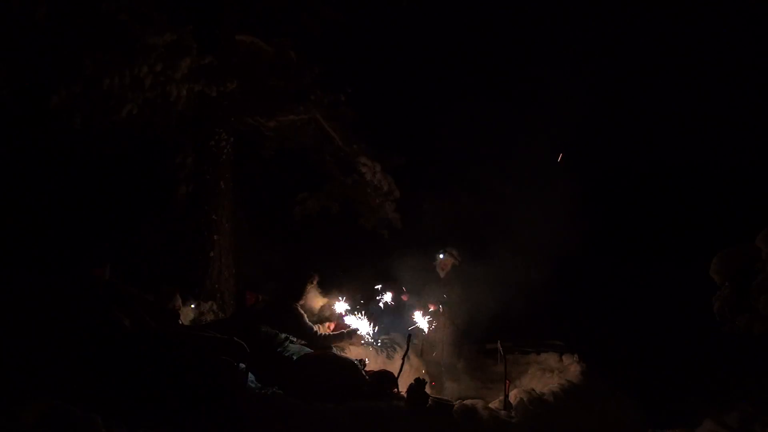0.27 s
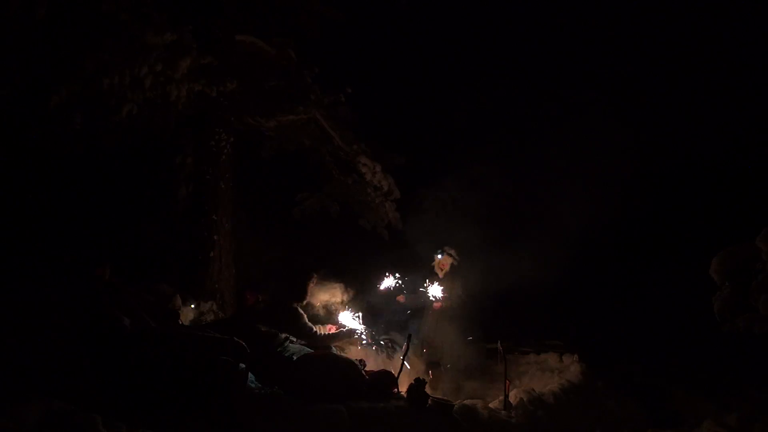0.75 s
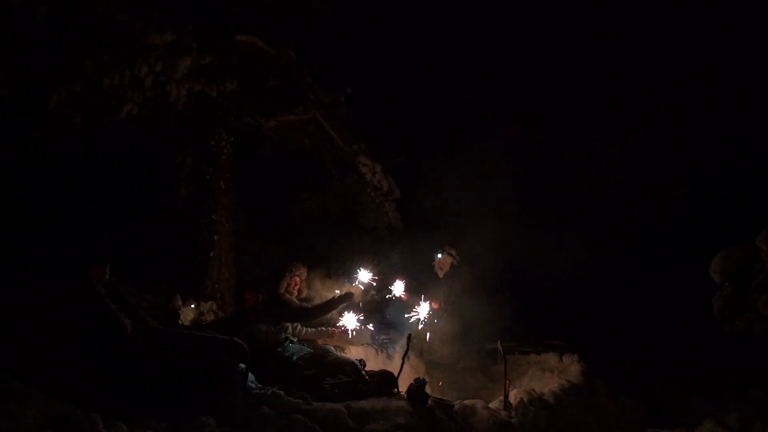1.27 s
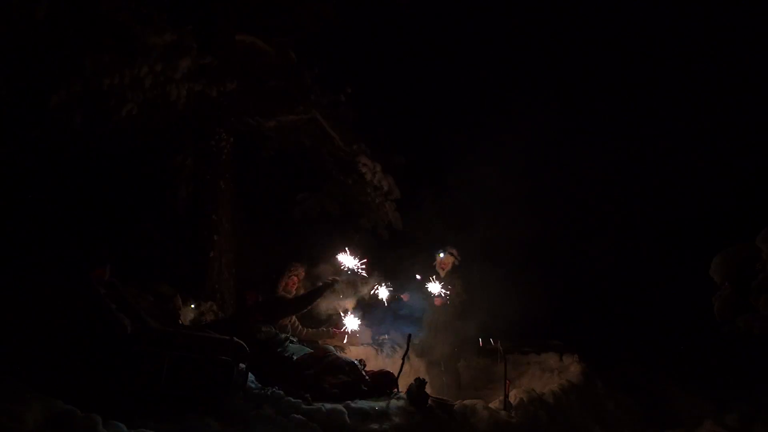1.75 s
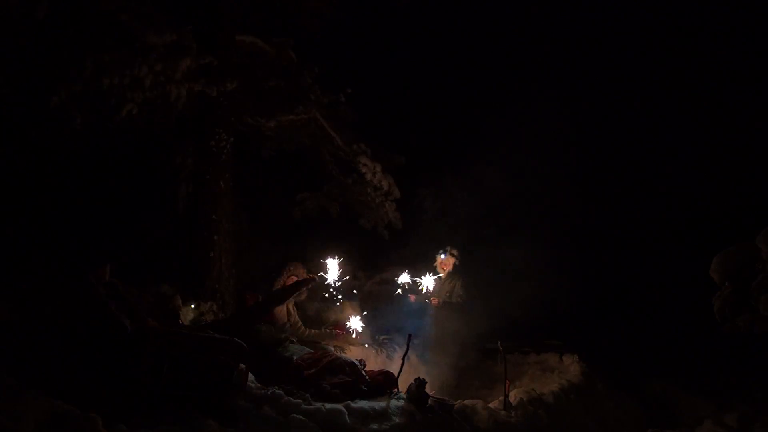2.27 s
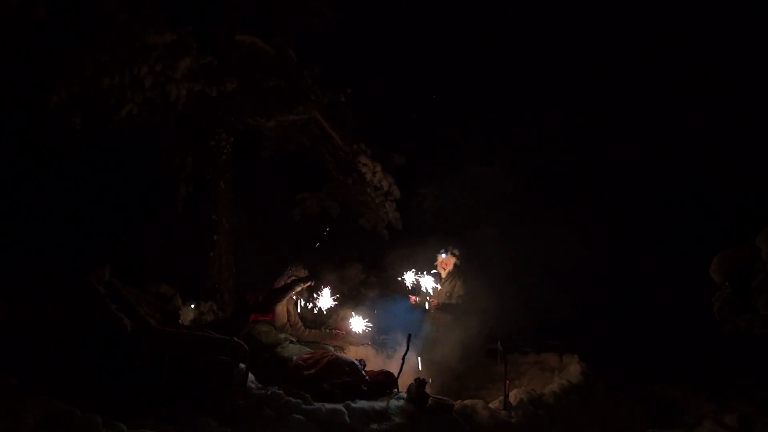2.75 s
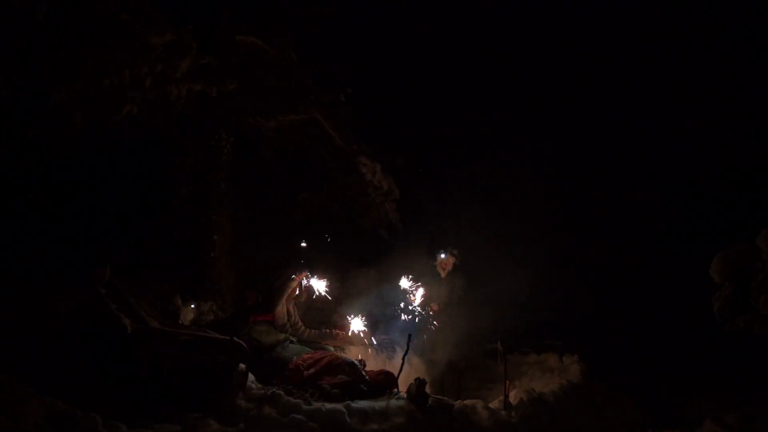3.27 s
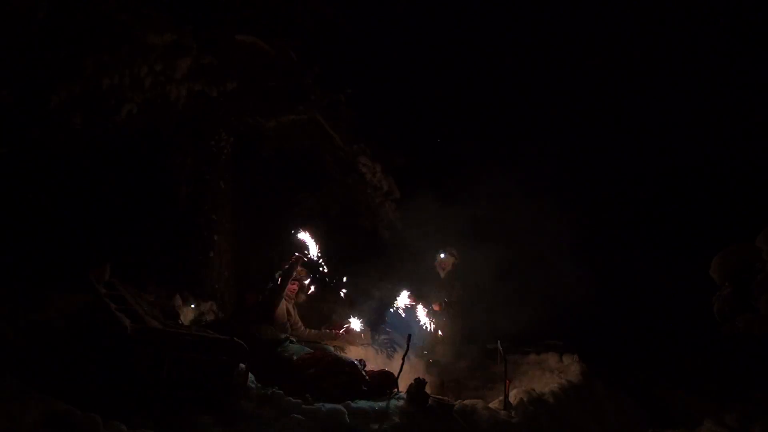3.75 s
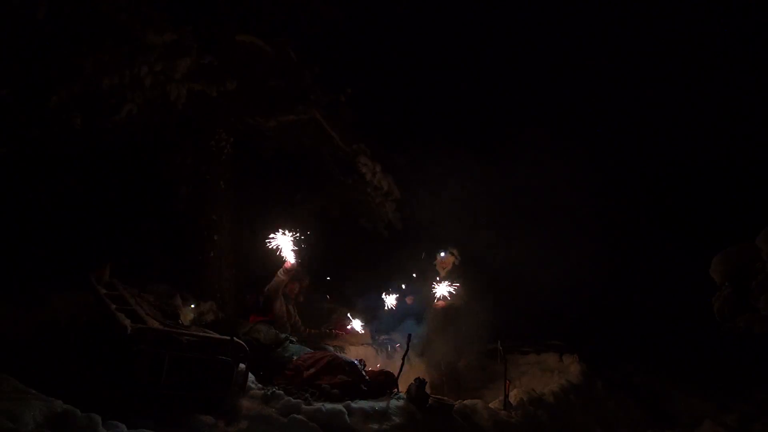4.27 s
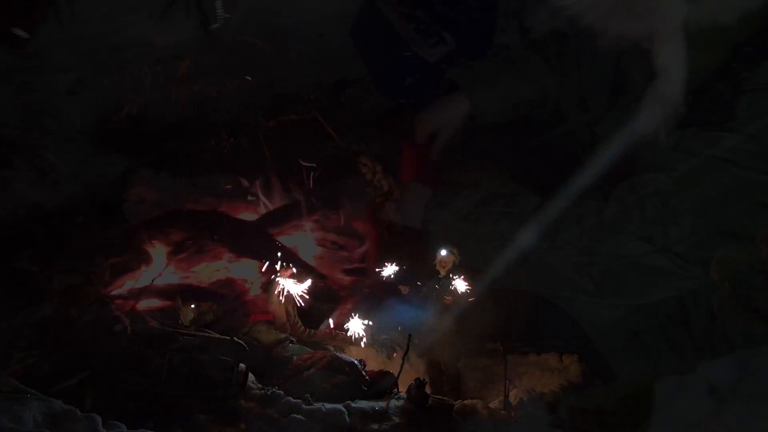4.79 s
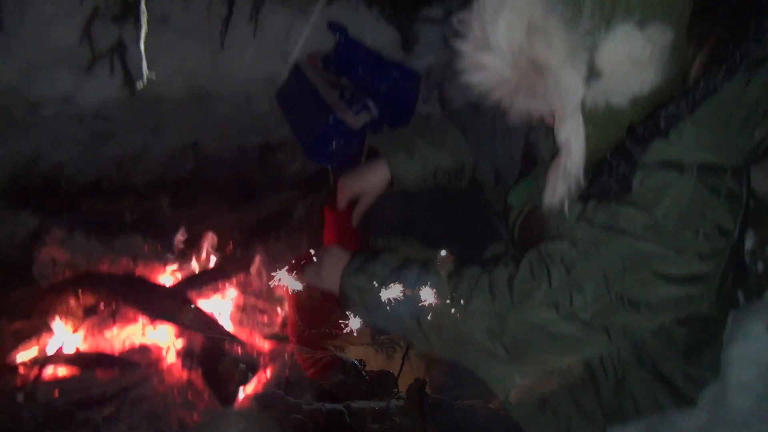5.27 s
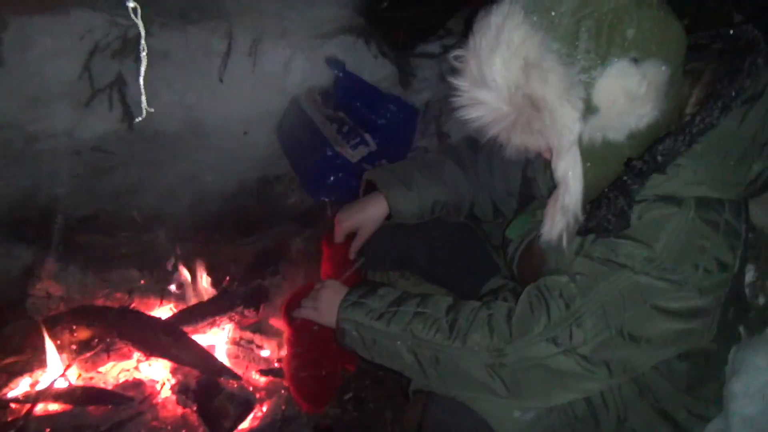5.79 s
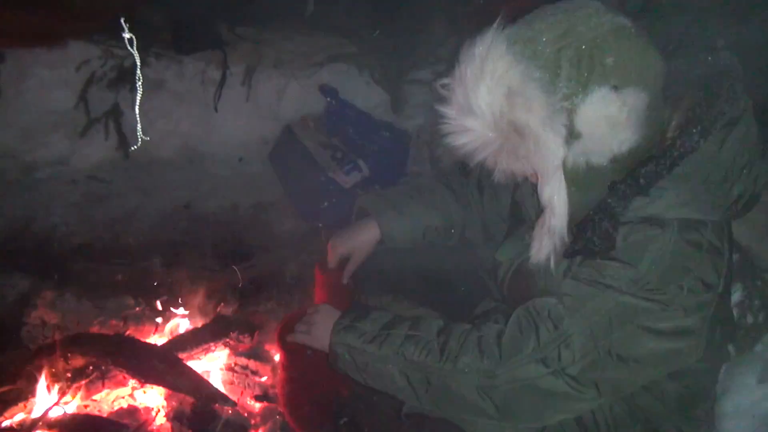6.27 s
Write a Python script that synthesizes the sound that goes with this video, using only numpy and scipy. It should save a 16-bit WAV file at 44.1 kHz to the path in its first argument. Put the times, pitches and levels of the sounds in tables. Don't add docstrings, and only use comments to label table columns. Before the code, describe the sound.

Outdoors on open rocky ground, several handheld sparklers burn some metres away in the centre: a steady, dense, bright fizz over a flame hiss, with irregular sharp pops bouncing briefly off ground and rocks. Near the end it slowly crossfades to a quieter, close, wide campfire with low fluttering flames, damp wood hiss, hollow stick knocks, crisp ember ticks and a faint scrape.

```python
import sys
import numpy as np
from scipy import signal
from scipy.fft import rfft, irfft, next_fast_len
from scipy.io import wavfile
from scipy.ndimage import map_coordinates

SR = 44100
rng = np.random.default_rng(int(sys.argv[2]) if len(sys.argv) > 2 else 0)


def rack_gain(trim_db):
    fader = np.asarray(trim_db, float)
    return 10 ** (fader / 20)


def bounce(signal):
    frames = np.transpose(np.atleast_2d(signal))
    limited = np.clip(frames, -1, 1)
    pcm = np.round(limited * 32767).astype(np.int16)
    wavfile.write(sys.argv[1], SR, pcm)


N = 287973

# pitch_hz [Hz], density_db [dB per Hz]
GRAIN_COLOUR = [(880, -19), (1500, -6.5), (1840, -6), (1940, -5.5), (2980, -7.5), (3280, -6), (4670, -7),
                (6650, 0), (7780, -0.5), (8920, -4), (10600, -0.5), (11900, -2.5), (13300, -7),
                (15600, -8.5)]
SCENE_FADE_S = 4.72, 5.64
PAN_SCATTER_DB = 1.5


def unit(x):
    return x / np.sqrt(np.mean(x ** 2) + 1e-20)


def along(points, hz):
    point_hz, value = np.transpose(points)
    return np.interp(np.log(hz + 1), np.log(point_hz + 1), value)


def curves(rows):
    s, *columns = np.transpose(rows)
    return [np.interp(np.arange(N) / SR, s, column) for column in columns]


def fade(start_s, end_s):
    return np.clip((np.arange(N) / SR - start_s) / (end_s - start_s), 0, 1)


def wobble(rate):
    knots = rng.standard_normal(int(N * rate / SR) + 4)
    return map_coordinates(knots, [np.arange(N) * rate / SR])


def filtered(x, response):
    length = x.shape[-1]
    m = next_fast_len(length + 8192)
    return irfft(rfft(x, m) * response(np.fft.rfftfreq(m, 1 / SR)), m)[..., :length]


def coloured(x, spectrum):
    return unit(filtered(x, lambda hz: rack_gain(along(spectrum, hz))))


def resonance(hz, centre_hz, width_hz):
    return 1j * hz * width_hz / (centre_hz ** 2 - hz ** 2 + 1j * hz * width_hz)


def bursts(per_second, spread_db):
    happens = rng.random(N) < per_second / SR
    size = np.minimum(rng.exponential(size=N), 3.8)
    return unit(happens * rack_gain(spread_db * size) * rng.standard_normal(N))


def wide(alike, spectrum):
    def mid_and_side(hz):
        angle = np.arccos(np.clip(along(alike, hz), -1, 1)) / 2
        return rack_gain(along(spectrum, hz)) * [np.cos(angle), np.sin(angle)]

    mid, side = filtered(rng.standard_normal((2, N)), mid_and_side)
    return unit(np.array([mid + side, mid - side]))


def add(track, s, sound):
    part = track[..., round(s * SR):][..., :sound.shape[-1]]
    part += sound[..., :part.shape[-1]]


def sides(pan_db):
    return rack_gain(np.array([[pan_db / 2], [-pan_db / 2]]))


def fizz():
    # start_s [s], level_db [dB]
    burn = [(0.0, -50.5), (0.25, -51), (0.4, -48.5), (0.76, -48), (0.93, -49.5), (1.18, -51.5),
            (1.51, -47.5), (1.7, -49.5), (2.0, -48), (2.66, -49.5), (2.94, -48.5), (3.27, -49.5),
            (3.55, -48.5), (4.05, -47.5), (4.3, -49.5), (4.65, -46.5), (4.9, -49)]
    # pitch_hz [Hz], density_db [dB per Hz]
    body_colour = [(18, -64), (30, -75), (96, -35), (242, -12), (350, -7.5), (506, -1.5), (560, -1),
                   (794, 4), (4000, -5.5), (5200, -21), (8800, -120)]
    # pitch_hz [Hz], level_db [dB]
    surround = [(40, -11), (200, -16), (700, -15.5), (1300, -16), (2300, -15.5), (3000, -22.5),
                (8000, -31.5), (15000, -27)]
    fizz_db, = curves(burn)
    body_db = -55 + 0.15 * (fizz_db - fizz_db.mean()) + 0.48 * np.arange(N) / SR
    grains = rack_gain(-3) * bursts(per_second=4000, spread_db=3) + rng.standard_normal(N)
    sputter_db = 0.27 * wobble(16) + 0.91 * wobble(40)
    high = rack_gain(fizz_db + 0.5 + sputter_db + 0.21 * wobble(21.9))
    low = rack_gain(body_db - 3.5 + 0.55 * sputter_db + 0.51 * wobble(10))
    mid = high * coloured(grains, GRAIN_COLOUR) + low * coloured(grains, body_colour)
    around = rng.standard_normal(N)
    diffuse = high * coloured(around, GRAIN_COLOUR) + low * coloured(around, body_colour)
    side = filtered(diffuse, lambda hz: rack_gain(along(surround, hz)))
    return np.array([mid + side, mid - side]) * (1 - fade(*SCENE_FADE_S))


def pops():
    # start_s [s], crack_db [dB peak],
    # thud_db [dB peak], thud_hz [Hz], echo_db [dB]
    grain_pops = [(0.0574, -28.5, -43, 3100, 1), (0.2987, -42.5, -55.5, 550, -3),
                  (0.6445, -26.5, -50, 1570, 1.5), (0.859, -26, -42, 3000, 2), (0.8645, -23, -55, 3500, 3),
                  (1.233, -31.5, -51, 1300, -2), (1.3906, -32, -56.5, 2300, 2),
                  (1.4258, -31, -61, 1800, -1), (2.0534, -16.5, -37, 1510, -3),
                  (2.0864, -31, -36.5, 1520, -8), (2.2208, -42, -52, 1500, -4),
                  (2.4526, -25, -45, 2190, -2), (2.614, -29, -53, 1500, -4.5), (2.686, -37, -45, 2200, -3),
                  (2.8928, -28, -46, 1400, -4.5), (2.97, -37.5, -49.5, 1600, -5.5),
                  (3.189, -44, -45.5, 2000, -5.5), (3.2602, -8, -19.5, 3010, 2.5),
                  (3.5787, -20, -39, 2010, 2), (3.686, -31.5, -45.5, 910, 1), (3.8845, -31, -37, 1600, -7),
                  (3.9654, -34, -56, 850, 1.5), (4.226, -34, -53, 900, 4), (4.9156, -30.5, -46, 2900, -2)]
    # delay_s [s], level_db [dB], t60_s [s]
    reflections = [
        (.0008, -20.5, .015),
        (.0045, -22.5, 0.045),
        (0.018, -34.5, .15),
        (0.033, -38.5, .2),
    ]
    last_rock_s = 0.041
    track, t = np.zeros((2, N)), np.arange(2400) / SR

    scatter = sum((t >= lag) * rack_gain(db - 2.0 - 60 * abs(t - lag) / t60) for lag, db, t60 in reflections)
    scatter = scatter * rack_gain(-60 * np.maximum(t - last_rock_s, 0) / 0.035)
    late = np.clip(t / 0.028, 0, 1)

    def crack_tone(hz):
        return rack_gain(along(GRAIN_COLOUR, hz)) * resonance(hz, 6300, 7000)

    def dulling(hz):
        return resonance(hz, 4740, 6500) / (1 + (hz / 10000) ** 2)

    def thin(hz):
        return (1j * hz / (150 + 1j * hz)) ** 2

    for s, crack_db, thud_db, thud_hz, echo_db in grain_pops:
        noise = rng.standard_normal((3, len(t)))
        shock = (np.arange(len(t)) == 8) + 0.5 * noise[0] * rack_gain(-60 * t / 0.0042)
        crack = filtered(shock, crack_tone)
        thud = np.sin(2 * np.pi * thud_hz * t) * np.sin(np.pi * np.clip(thud_hz * t, 0, 1))
        direct = -rack_gain(crack_db - 1.5) * crack / abs(crack).max() + rack_gain(thud_db + 12.0) * thud
        ground = scatter * (noise[1] + 0.071 * noise[2] * [[1], [-1]])
        ground = (1 - late) * ground + late * filtered(ground, dulling)
        ground[:, round(0.0046 * SR)] += rack_gain(-21.0)
        echoes = rack_gain(echo_db) * signal.fftconvolve(direct[None], ground, axes=1)[:, :len(t)]
        add(track, s + 0.0005, filtered(direct + echoes, thin))
    return track


def flames():
    # start_s [s], level_db [dB]
    blaze = [(4.93, -53), (5.1, -58), (5.35, -60), (5.56, -59.5), (5.8, -64), (6.0, -65), (6.53, -59)]
    # pitch_hz [Hz], likeness [0..1]
    likeness = [(60, 0.99), (200, 0.99), (400, 0.96), (700, 0.977), (1300, 0.53), (2400, 0.57),
                (4400, 0.89), (8000, 0.98), (15000, 1)]
    # pitch_hz [Hz], density_db [dB per Hz]
    rush_colour = [(18, -67), (30, -42), (248, -9.5), (357, -10), (386, -3.5), (431, -12), (529, -2.5),
                   (737, -4.5), (810, -6.5), (890, -5.5), (979, -0.5), (1300, -42), (1690, -63),
                   (2860, -120)]
    rumble_colour = [(20, -20), (40, -1), (70, -6), (150, 4), (250, 2), (400, -60)]
    hiss_colour = [(650, -20), (1100, 2), (2660, 0.5), (3740, -2.5), (5080, -5.5), (6090, -2),
                   (12000, -3.5), (15400, -10), (16500, -30)]
    rush_db, = curves(blaze)
    hiss_db = -59.5 + 0.44 * (rush_db - rush_db[-1])
    flutter_db = 1.5 * wobble(12) + 1.8 * wobble(45)
    rush = rack_gain(rush_db + 0.8 + flutter_db) * wide(likeness, rush_colour)
    rumble = rack_gain(-79.0 + 2.4 * wobble(4.6)) * wide(likeness, rumble_colour)
    spit = coloured(bursts(per_second=900, spread_db=2.5), hiss_colour)
    steam = wide(likeness, hiss_colour)
    hiss = rack_gain(hiss_db - 2.5 + 0.39 * wobble(25)) * (steam + rack_gain(-1.5) * spit)
    return (rush + rumble + hiss) * fade(*SCENE_FADE_S)


def sticks():
    # start_s [s], level_db [dB peak], pitch_hz [Hz], push_db [dB]
    blows = [(4.9385, -44, 1000, 1.5), (4.983, -43.5, 960, 5), (5.012, -52, 798, -1), (5.039, -43, 950, 6),
             (5.196, -57, 945, -8), (5.403, -52, 528, -12.5), (5.44, -42.5, 917, -4.5),
             (5.459, -50, 685, 3), (5.5725, -42, 1350, -9), (5.637, -49, 1150, -5), (5.92, -47, 758, -13),
             (5.953, -50, 790, 3), (5.975, -46.5, 974, 3), (5.99, -48, 970, 2.5), (6.066, -52, 977, -14),
             (6.079, -43.5, 970, -2.5), (6.112, -42, 1302, -5.5), (6.131, -46, 1020, -4),
             (6.149, -43.5, 830, -6.5), (6.174, -60, 999, -1), (6.235, -49, 1000, -11.5),
             (6.275, -55.5, 592, 0), (6.441, -50.5, 930, -4.5)]
    # pitch_hz [Hz], width_hz [Hz], level_db [dB]
    modes = [(184.6, 300, -10.5), (351, 304, -2), (550, 94, -8), (760, 106, -3), (1020, 75, -2.5),
             (1350, 50, -12)]
    track, t = np.zeros((2, N)), np.arange(2600) / SR

    def wood(hz):
        return sum((-1) ** k * rack_gain(db) * resonance(hz, c, w) for k, (c, w, db) in enumerate(modes))

    for s, db, pitch_hz, push_db in blows:
        pan_db = 0.88 + PAN_SCATTER_DB * rng.standard_normal()
        rattle = rng.standard_normal((2, len(t))) * rack_gain(-20 - 60 * t / 0.07)
        blow = (np.arange(len(t)) == 0) + rattle[0] + 0.19 * rattle[1] * [[1], [-1]]

        def body(hz):
            own_pitch = rack_gain(2.5) * resonance(hz, pitch_hz, 250)
            push = rack_gain(push_db) * resonance(hz, 409, 660) ** 2
            return (wood(hz) + own_pitch + push) / (1 + 1j * hz / 1500) ** 2

        knock = filtered(blow, body)
        add(track, s, -rack_gain(db + 5.0) * sides(pan_db) * knock / abs(knock).max())
    return track


def embers():
    # start_s [s], level_db [dB peak], pitch_hz [Hz], width [octaves]
    snaps = [(5.123, -34, 2460, 1.2), (5.22, -34.5, 1800, 1.15), (5.2398, -33, 7880, 1.13),
             (5.2946, -34, 11000, 0.46), (5.5718, -33, 2500, 1.3), (5.5798, -37, 9500, .8),
             (5.6387, -21, 7400, 2.3), (5.7039, -36, 10200, 0.48), (5.7207, -34.5, 8230, 1.5),
             (5.7658, -41.5, 7970, 1.06), (5.8336, -38.5, 6200, 1.02), (5.8785, -41, 10300, 0.51),
             (5.9773, -41, 10800, .96), (6.0057, -33, 11200, 1.08), (6.0174, -43, 10000, 1.2),
             (6.0786, -42, 2180, 2), (6.1129, -18.5, 10500, 0.54), (6.1325, -31.5, 1920, 0.5),
             (6.1457, -37, 8040, 1.2), (6.1494, -34, 2420, 0.34), (6.2357, -41, 1900, 0.93),
             (6.2561, -39, 6950, 0.73), (6.314, -38, 7260, .97), (6.3247, -36, 5850, 1.04),
             (6.3299, -40, 1930, 0.32), (6.4093, -30, 3800, .3), (6.4246, -41, 3680, .5),
             (6.457, -40, 2280, 1.3), (6.4782, -39, 2090, 1.2), (6.5038, -30.5, 2320, 3.6)]
    track, t = np.zeros((2, N)), np.arange(700) / SR

    def air(hz):
        return resonance(hz, 4300, 18000) / (1 + (hz / 12500) ** 4) * 1j * hz / (600 + 1j * hz)

    for s, db, pitch_hz, octaves in snaps:
        pan_db = 1.28 + PAN_SCATTER_DB * rng.standard_normal()
        decay = rack_gain(-60 * t / 0.0024) + rack_gain(-6.0 - 60 * t / 0.018)
        puff = rng.standard_normal((2, len(t))) * decay
        snap = 1.96 * (np.arange(len(t)) == 0)
        source = snap + puff[0] + 0.15 * puff[1] * [[1], [-1]]
        char = rack_gain(np.clip(db + 18, -30, 0) - 3)

        def tone(hz):
            own_pitch = resonance(hz, pitch_hz, pitch_hz * octaves)
            return air(hz) * (own_pitch + char * resonance(hz, 3200, 1800))

        tick = filtered(source, tone)
        add(track, s + 0.00083, rack_gain(db - 1.5) * sides(pan_db) * tick / abs(tick).max())
    return track


def scrape():
    # start_s [s], length_s [s], level_db [dB], pitch_hz [Hz]
    strokes = [
        (6.07, 0.19, -51, 1900),
        (6.347, 0.22, -58, 1610),
    ]
    bite_s, ease_db, slide_hz = 0.025, 11, 200
    track = np.zeros((2, N))
    for s, length_s, db, start_hz in strokes:
        progress = fade(s, s + length_s)
        level_db = db - ease_db * np.sqrt(progress)
        centre_hz = start_hz + slide_hz * progress
        grit = rng.standard_normal((2, N)) * rack_gain(1.5 * wobble(150))
        grit = grit[0] + 0.6 * grit[1] * [[1], [-1]]
        low = unit(filtered(grit, lambda hz: resonance(hz, 1150, 800) ** 2))
        high = unit(filtered(grit, lambda hz: resonance(hz, 2300, 800) ** 2))
        share = np.clip((centre_hz - 1500) / 1200, 0, 1)
        on = fade(s, s + bite_s) * (1 - fade(s + length_s - 0.03, s + length_s + 0.01))
        track += rack_gain(level_db + 4.5) * on * (np.sqrt(1 - share) * low + np.sqrt(share) * high)
    return track


def scene():
    return fizz() + pops() + flames() + sticks() + embers() + scrape()


def roll_off(x):
    return signal.sosfilt(signal.butter(12, 16990, fs=SR, output="sos"), x)


def record(dry):
    def microphone(hz):
        band_limit = np.where(hz < 15780, 1, rack_gain(-36))
        return band_limit * (1j * hz / (80 + 1j * hz))

    mix = filtered(dry, microphone)
    return roll_off(mix)


dry = scene()
out = record(dry)
bounce(out)
```